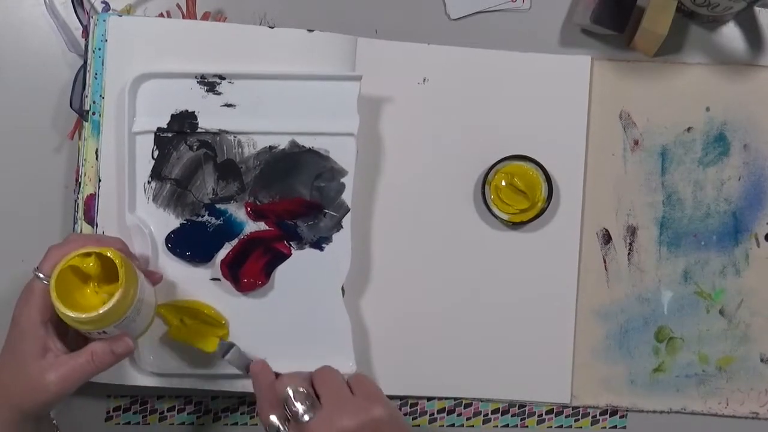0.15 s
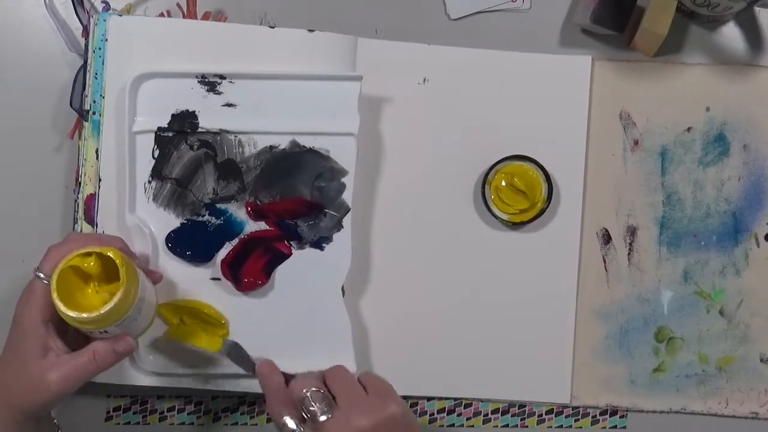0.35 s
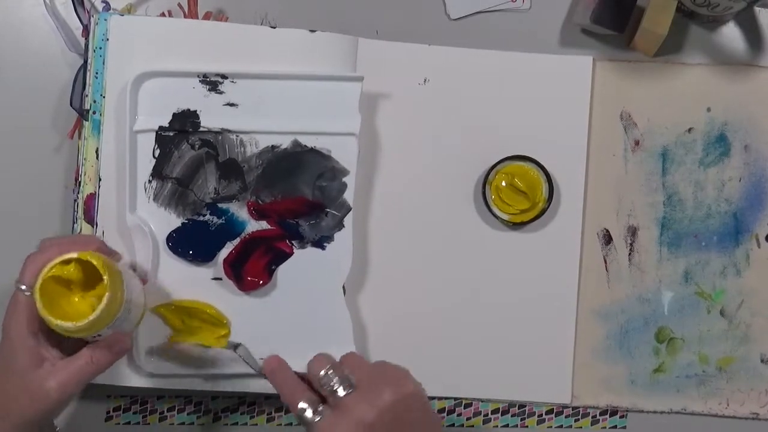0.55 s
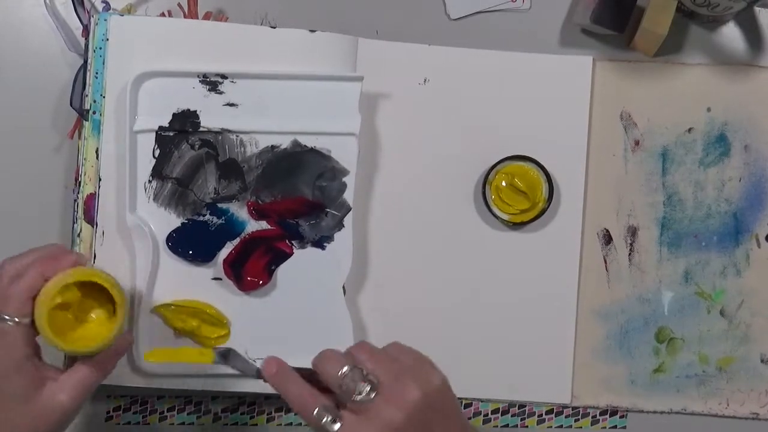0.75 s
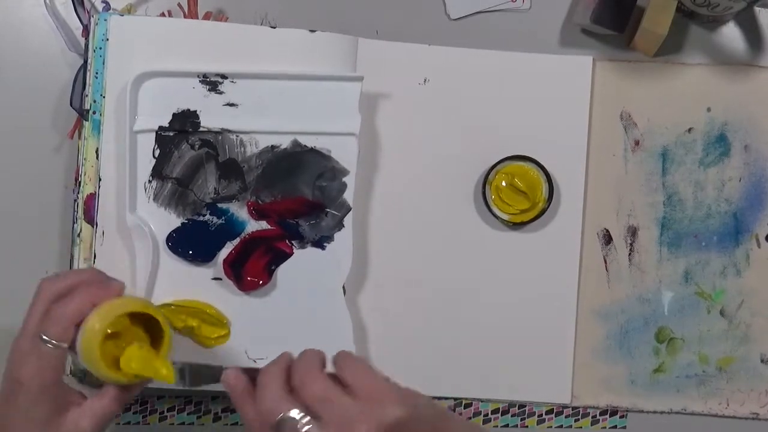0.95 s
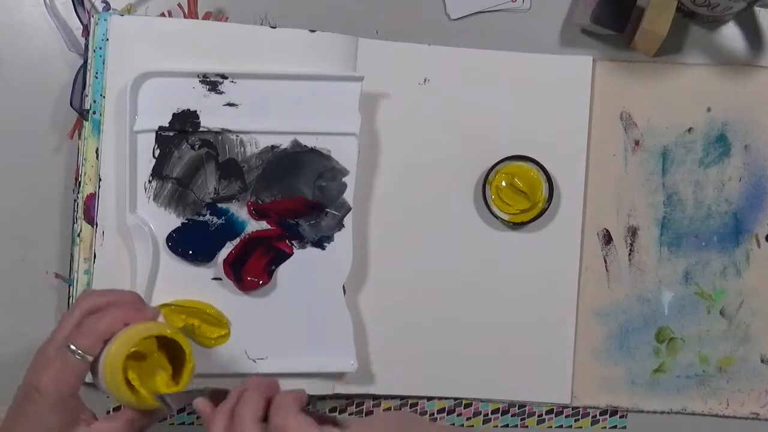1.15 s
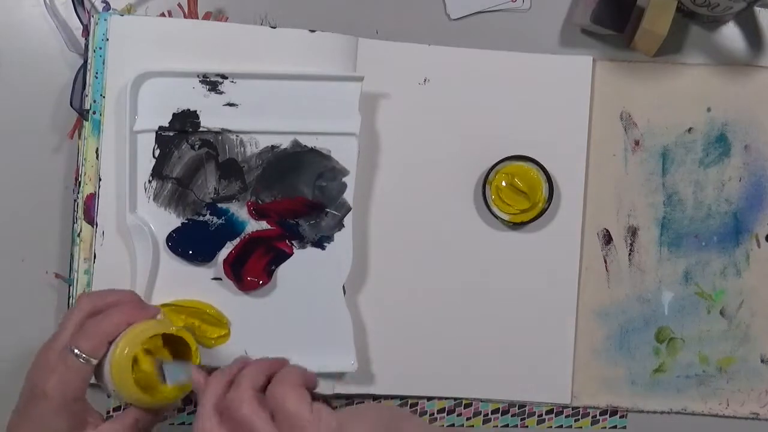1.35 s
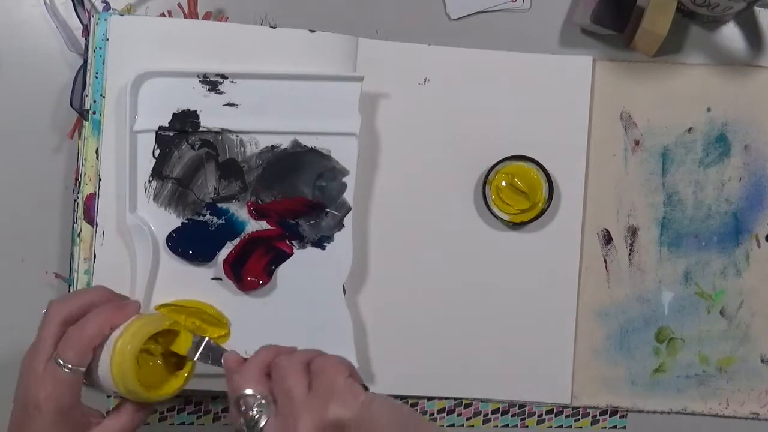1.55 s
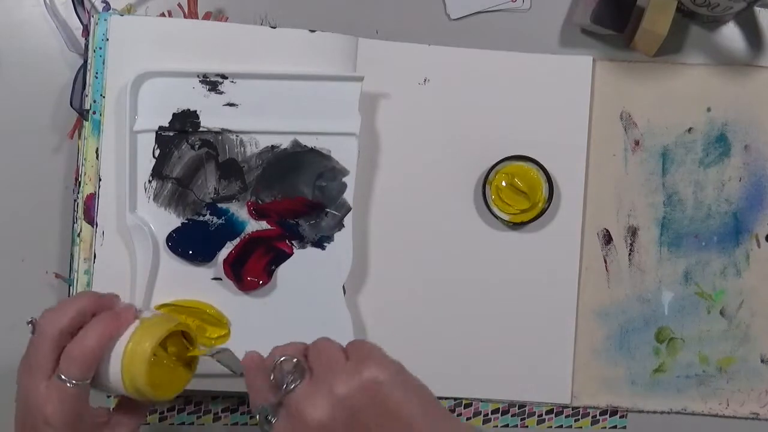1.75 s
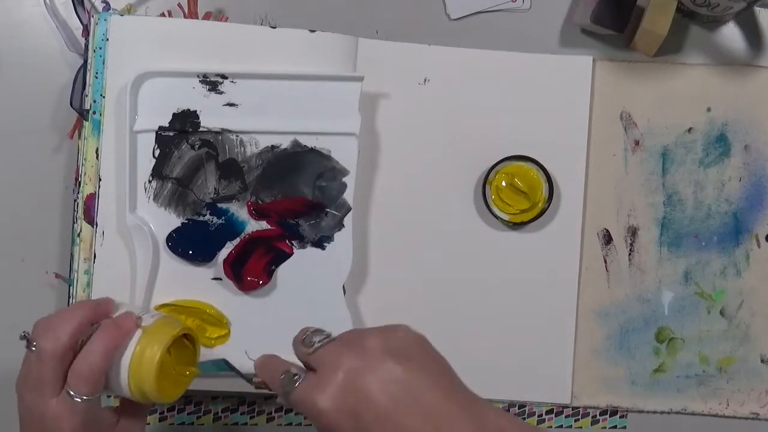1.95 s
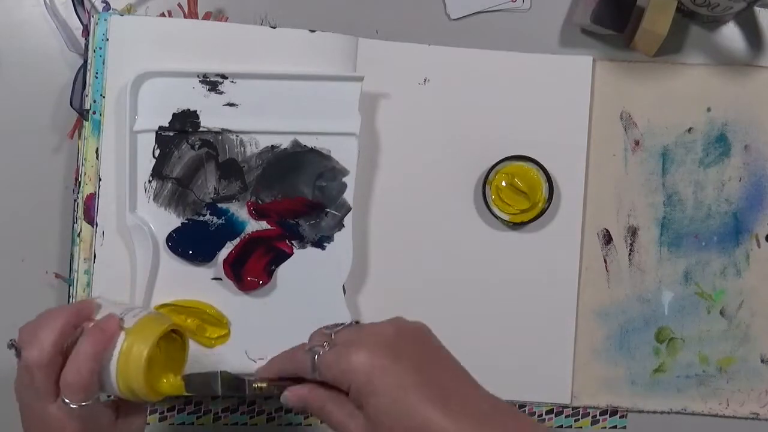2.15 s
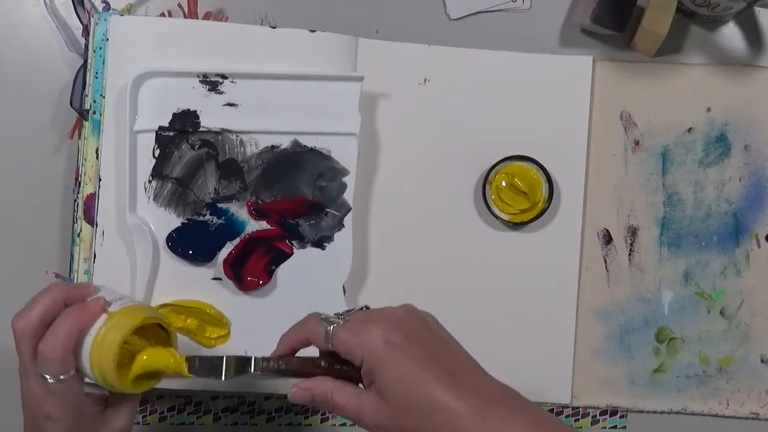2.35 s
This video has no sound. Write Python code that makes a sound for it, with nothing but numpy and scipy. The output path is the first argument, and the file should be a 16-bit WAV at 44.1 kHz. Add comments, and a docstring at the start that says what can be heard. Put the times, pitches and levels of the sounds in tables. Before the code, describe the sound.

A palette knife clacks hard on a plastic palette at about 0.1, 0.25 and 0.45 seconds, bright and dry with a short room tail and faint steel ring. After a pause, far quieter sticky scrapes in a small plastic paint jar run from 1.2 to 2.3 seconds, busiest around 1.3 to 1.7, with tiny rim ticks. A low, slightly sinking motor hum and soft room tone continue throughout.

```python
"""Palette knife and paint jar

Close in a small, fairly live room: a palette knife clacks three times on a plastic palette, each a blow and
rattle through resonances, with a faint blade ring. It then scoops thick paint from a small plastic jar: short
sticky scrapes, made of slip impulses and noise, sound the hollow, and noise bursts tick the blade on the rim.
Behind lie a slowly sinking motor hum (a sine and weak octave), low booms and room tone; the mic is almost mono."""
import sys
import numpy as np
from scipy import signal
from scipy.fft import rfft, irfft, next_fast_len
from scipy.io import wavfile
from scipy.ndimage import map_coordinates

SR = 44100
rng = np.random.default_rng(int(sys.argv[2]) if len(sys.argv) > 2 else 0)


def digitize_waveform(pressure):
    """Quantize a signal to 16-bit integers and store it at the path in sys.argv[1].

    Rows of a 2-D input are taken as channels; values are limited to [-1, 1].
    """
    field = np.atleast_2d(pressure).T
    bounded = np.clip(field, -1, 1)
    quanta = np.round(bounded * 32767).astype(np.int16)
    wavfile.write(sys.argv[1], SR, quanta)


N = 110250  # 2.5 s

# Hard taps on the palette: (time [s], level [dB], contact rattle t60 [s], treble tilt [dB/octave],
# resonance favoured by the spot struck [Hz], its boost [dB])
PALETTE_TAPS = [(0.106, -3.5, 0.003, -0.4, 10500, 6.5), (0.2649, -1, .010, -0.3, 2820, 2.5),
                (0.4263, -3.5, 0.017, -0.5, 6560, 8)]
# Resonances of blade and palette together: (frequency [Hz], width [Hz], relative level [dB])
PALETTE_RESONANCES = [(405, 210, -1), (555, 156, -7.5), (826, 66, -10.5), (1210, 120, -11), (1730, 800, -4),
                      (2760, 430, 0), (3340, 930, 4), (4110, 500, -2), (5270, 1140, 4), (6100, 480, -3.5),
                      (7250, 360, -12), (8260, 500, -4.5), (9910, 570, 0.5)]
# Long faint ring of the steel blade: (frequency [Hz], level relative to its tap [dB], t60 [s])
BLADE_RING = [(3345, -46, .3), (3421, -45, .3), (4118, -49, .28), (5401, -44, .3), (5474, -47, .3),
              (5588, -45, .3), (5642, -46, .3), (6174, -48, .25)]
PALETTE_LOW_HZ = 302  # so small an object radiates little below this
SPOT_WIDTH_HZ, TILT_PIVOT_HZ = 440, 4000
RING_SCATTER_DB = 1.5
WALL_S, WALL_DB = 0.0088, -17  # first echo of the taps
TAP_ROOM_DB = -6.5


def palette_taps():
    """Each tap is a sharp blow and very short rattle through resonances; the blade rings on faintly."""
    out = np.zeros((2, N))
    low_cut = signal.butter(4, PALETTE_LOW_HZ, 'high', fs=SR, output='sos')
    for start, db, t60, tilt_db, spot_hz, spot_db in PALETTE_TAPS:
        t = since(start)

        def body(f):
            return sum(amp(level + tilt_db * np.log2(hz / TILT_PIVOT_HZ)) * resonance(f, hz, width)
                       for hz, width, level in PALETTE_RESONANCES)

        def spot_and_wall(f):
            spot = 1 + (amp(spot_db) - 1) * resonance(f, spot_hz, SPOT_WIDTH_HZ)
            wall = 1 + amp(WALL_DB) * np.exp(-2j * np.pi * f * WALL_S)
            return spot * wall

        impulse = 1.0 * (t == 0)
        blow = signal.sosfilt(low_cut, filtered(impulse, body))
        blow = 3.26 * blow / np.linalg.norm(blow)
        rattling = signal.fftconvolve(blow, contact_rattle(t60))[:N]
        clack = filtered(rattling, spot_and_wall)
        ring = np.zeros(N)
        for hz, level, life in BLADE_RING:
            gain = amp(level + rng.normal(0, RING_SCATTER_DB))
            ring += gain * np.sin(2 * np.pi * hz * t) * dying(t, life)
        out += amp(db) * in_room(clack + ring, TAP_ROOM_DB, blow)
    return out


RATTLE_DB, RATTLE_HOLD_S = 1, 0.0016  # chatter relative to the blow; time before it starts to decay


def contact_rattle(t60, size=1024, count=6):
    """A blow and its brief chatter, pushed towards an even spectrum, with energy 1."""
    t = np.arange(size) / SR
    envelope = dying(np.maximum(t - RATTLE_HOLD_S, 0), t60)
    chatter = rng.standard_normal(size) * envelope
    blow = 1.0 * (t == 0)
    force = amp(RATTLE_DB) * chatter / np.linalg.norm(chatter) - blow
    for _ in range(count):
        flat = irfft(np.exp(1j * np.angle(rfft(force))))  # keep only the phases
        force = flat * envelope ** .25
    return force / np.linalg.norm(force)


# Scrapes in the jar: (start [s], rise [s], hold [s], fall [s], level [dB],
# hollow [Hz], hollow level [dB], blade [Hz], blade level [dB])
JAR_SCRAPES = [(0.798, 0.054, .03, 0.061, -67, 1550, 8.5, 5400, -0.5),
               (1.229, 0.034, 0.077, .05, -64.5, 1580, 9.5, 3060, -0.5),
               (1.303, 0.057, 0.013, 0.045, -39.5, 1645, -3, 7000, -6),
               (1.355, .028, .036, 0.013, -35.5, 1810, -19, 3540, -12),
               (1.385, 0.024, 0.074, 0.03, -47.5, 1500, -15, 5250, -6.5),
               (1.466, 0.023, 0.023, 0.078, -44.5, 1350, -9.5, 2650, -0.5),
               (1.489, .019, .015, 0.0099, -38, 1370, -11, 3880, -0.5),
               (1.519, 0.0046, .028, 0.018, -49, 1300, -14, 6160, -1.5),
               (1.612, 0.0024, 0.015, .02, -44, 1000, -13, 6170, -3),
               (1.664, .002, 0.0036, 0.013, -41, 1080, -29.5, 3080, -5),
               (1.674, 0.004, 0.003, 0.036, -42, 1080, 2.5, 6330, -3),
               (1.684, .008, 0.027, 0.014, -49, 1100, -37, 3600, -6.5),
               (1.733, 0.036, 0.067, 0.11, -54.5, 1125, -5.5, 6250, -13),
               (1.869, .035, 0.049, 0.18, -52.5, 1160, -1.5, 4732, -6.5),
               (2.042, 0.022, .04, 0.045, -56.5, 1260, -20, 8600, -14),
               (2.108, 0.0017, 0.038, 0.042, -52.5, 1270, -8, 3650, 0.5),
               (2.264, 0.024, 0.027, 0.047, -60.5, 1250, -6, 4700, -2)]
HOLLOW_WIDTH_HZ, BLADE_WIDTH_HZ = 300, 520
SCRAPE_WAVER_DB = 1.5


def jar_scrapes():
    """Each stroke swells, holds and dies; its slips sound the jar's hollow and a pressed-blade resonance."""
    out = np.zeros(N)
    force = stick_slip()
    rub = jar_body(force)
    for start, rise, hold, fall, db, hollow_hz, hollow_db, blade_hz, blade_db in JAR_SCRAPES:
        corners = np.cumsum([0, rise, hold, fall])
        pressure = np.interp(since(start), corners, [0, 1, 1, 0]) ** 1.96
        hollow = amp(hollow_db) * narrow(force, hollow_hz, HOLLOW_WIDTH_HZ)
        blade = amp(blade_db) * narrow(force, blade_hz, BLADE_WIDTH_HZ)
        out += amp(db) * pressure * (rub + hollow + blade)
    return out * amp(SCRAPE_WAVER_DB * wobble(130))


SLIPS_PER_S, SMOOTH_SHARE = 3500, 0.45  # smooth rubbing's share of the power
JAR_ECHO_S, JAR_ECHO_DRIFT_S, JAR_ECHO_SHARE = .0014, .00006, .3  # it shifts as the knife moves


def stick_slip():
    """Dense tiny stick-slip impulses over smooth rubbing, with a drifting echo from the jar's far wall."""
    grains = (rng.random(N) < SLIPS_PER_S / SR) * rng.standard_normal(N)
    smooth = rng.standard_normal(N)
    force = np.sqrt(1 - SMOOTH_SHARE) * unit(grains) + np.sqrt(SMOOTH_SHARE) * smooth
    delay = JAR_ECHO_S + JAR_ECHO_DRIFT_S * wobble(12)
    echo = map_coordinates(force, [np.arange(N) - delay * SR])
    return force + JAR_ECHO_SHARE * echo


# Ticks of the blade on the jar's rim: (time [s], level [dB], hollow [Hz])
RIM_TICKS = [(1.2245, -38, 1620), (1.6135, -40, 1000), (1.6638, -33, 1100), (1.6772, -37, 1040),
             (1.9468, -35.5, 1240), (2.1140, -43, 1250), (2.3255, -47, 1230)]
TICK_T60_S, TICK_HOLLOW_DB = .022, -8


def rim_ticks():
    """Light knocks on the rim, damped by paint: dying noise bursts through the jar and its hollow."""
    out = np.zeros(N)
    for start, db, hollow_hz in RIM_TICKS:
        burst = rng.standard_normal(N) * dying(since(start), TICK_T60_S)
        hollow = amp(TICK_HOLLOW_DB) * narrow(burst, hollow_hz, HOLLOW_WIDTH_HZ)
        out += amp(db) * np.std(burst) * (jar_body(burst) + hollow)
    return out


# Resonances of the jar and knife: (frequency [Hz], width [Hz], relative level [dB])
JAR_RESONANCES = [(660, 440, -12), (2100, 120, -5), (2710, 210, 0), (3340, 590, 3), (4000, 1000, 3),
                  (5400, 930, 6), (6260, 330, -4.5), (7250, 570, -7), (8600, 1100, 0.5), (9570, 560, 0),
                  (10070, 600, -7)]


def jar_body(x):
    """x through the resonances of jar and knife, at rms 1."""
    def body(f):
        return sum(amp(db) * resonance(f, hz, width) for hz, width, db in JAR_RESONANCES)
    return unit(filtered(x, body))


# Reverberation of the room: (frequency [Hz], t60 [s])
ROOM_T60 = [(200, 0.16), (1000, 0.27), (3500, 0.4073), (6000, 0.36), (10500, 0.32)]
# Colour of the reverberation: (frequency [Hz], level [dB])
ROOM_TINT = [(200, 5.5), (1200, -0.5), (3500, -5), (5500, -2), (7500, -2.5), (10500, -7)]
ROOM_BUILD_S, SIDE_DB = 0.0013, -24.5
DESK_T60_S, DESK_SIDE_DB = 0.036, -23.5  # scatter off the desk, unlike in the two channels


def in_room(x, wet_db, drive):
    """The direct sound, its scatter off the desk, and a fresh, nearly mono room tail raised by drive."""
    hz, t, noise = signal.stft(rng.standard_normal((2, SR // 2)), SR, nperseg=256)
    decay = dying(t, along(ROOM_T60, hz)[:, None])
    colour = amp(along(ROOM_TINT, hz))[:, None]
    build = 1 - np.exp(-t / ROOM_BUILD_S)
    tail = signal.istft(noise * decay * colour * build, SR, nperseg=256)[1]
    tail = tail / np.linalg.norm(tail[0])
    mid, side = amp(wet_db) * signal.fftconvolve(drive[None], tail, axes=1)[:, :N]
    desk = rng.standard_normal(SR // 20) * dying(np.arange(SR // 20) / SR, DESK_T60_S)
    scatter = signal.fftconvolve(x, desk / np.linalg.norm(desk))[:N]
    side = amp(SIDE_DB) * side + amp(DESK_SIDE_DB) * scatter
    return x + np.array([mid + side, mid - side])


# Motor hum: (time [s], pitch [Hz], level [dB])
MOTOR_HUM = [(0, 123.8, -43), (.17, 123.5, -35), (.5, 121, -37), (.86, 117.7, -34.5), (.95, 117.4, -43),
             (1.15, 117.4, -37.5), (1.4, 114.6, -50), (1.8, 115.8, -39), (2.05, 114.2, -43),
             (2.18, 115, -37.5), (2.3, 116.7, -47), (2.5, 115.9, -41)]
OCTAVE_DB = -62.5


def motor_hum():
    """A sinking sine and its weak octave, both wavering in level."""
    s, pitch, level = np.transpose(MOTOR_HUM)
    t = since(0)
    phase = 2 * np.pi * np.cumsum(np.interp(t, s, pitch)) / SR
    fundamental = amp(np.interp(t, s, level) + 0.93 * wobble(14)) * np.sin(phase)
    octave = amp(OCTAVE_DB + 4.8 * wobble(5.72)) * np.sin(2 * phase)
    return np.sqrt(2) * (fundamental + octave)  # levels are rms


# Narrow booms of the room: (frequency [Hz], width [Hz], level [dB])
ROOM_BOOMS = [(154.9, 8.5, -47.5), (198.1, 6.9, -57), (231.9, 7.6, -61), (280, 25, -58.5),
              (374, 100, -63.5)]
# Slow change of those booms: (time [s], gain [dB])
BOOM_GAIN = [(0, -6.5), (.8, -1), (1.2, -1.5), (1.5, 4), (1.9, 1.5), (2.5, 1.5)]
DEEP_HZ, DEEP_WIDTH_HZ, DEEP_DB = 73.9, 7, -51  # lowest boom, steady


def room_booms():
    """Noise through narrow room resonances."""
    booms = sum(amp(db) * narrow(rng.standard_normal(N), hz, width) for hz, width, db in ROOM_BOOMS)
    gain = amp(np.interp(since(0), *np.transpose(BOOM_GAIN)))
    deep = amp(DEEP_DB) * narrow(rng.standard_normal(N), DEEP_HZ, DEEP_WIDTH_HZ)
    return gain * booms + deep


# Spectrum of the room tone: (frequency [Hz], relative density [dB per Hz])
AIR_SPECTRUM = [(20, -34), (40, -20.5), (60, -11), (105, 1.5), (150, 0), (200, -14), (300, -14), (450, -22),
                (650, -19.5), (950, -23.5), (1500, -27.5), (2200, -31), (5500, -34), (8000, -35.5),
                (11000, -41)]
# Stereo width of the room tone: (frequency [Hz], side level [dB])
AIR_WIDTH = [(30, -13), (70, -9), (130, -18.5), (250, -9.5), (500, -13), (1500, -16), (8000, -29)]
AIR_DB = -43.5


def room_tone():
    """Coloured noise as a mid and a weaker side signal."""
    mid, side = amp(AIR_DB) * coloured(rng.standard_normal((2, N)), AIR_SPECTRUM)
    return mid, filtered(side, lambda f: amp(along(AIR_WIDTH, f)))


BASS_LEFT_DB = 1.7  # left over right below 200 Hz


def background():
    """Hum, booms and room tone, the bass leaning a little to the left."""
    air, side = room_tone()
    mid = motor_hum() + room_booms() + air

    def lean(f):
        return amp(np.outer([.5, -.5], along([(200, BASS_LEFT_DB), (600, 0)], f)))

    return filtered(np.array([mid + side, mid - side]), lean)


def amp(db):
    """Decibels to gain."""
    return 10 ** (np.asarray(db) / 20)


def unit(x):
    """Scale to rms 1."""
    return x / np.sqrt(np.mean(x ** 2) + 1e-20)


def along(points, hz):
    """(Hz, value) points interpolated on a log frequency axis."""
    f, v = np.transpose(points)
    return np.interp(np.log(hz + 1), np.log(f + 1), v)


def wobble(rate):
    """A smooth random curve, rate knots a second."""
    knots = rng.standard_normal(int(N * rate / SR) + 4)
    return map_coordinates(knots, [np.arange(N) * rate / SR])


def filtered(x, response):
    """x through a complex response of frequency."""
    m = next_fast_len(N + SR // 2)
    return irfft(rfft(x, m) * response(np.fft.rfftfreq(m, 1 / SR)), m)[..., :N]


def resonance(f, hz, width):
    """Causal response of one resonance."""
    return 1j * f * width / (hz * hz - f * f + 1j * f * width)


def narrow(x, hz, width):
    """x twice through one resonance, at rms 1."""
    b, a = signal.iirpeak(hz, hz / (1.5 * width), fs=SR)  # two passes narrow it back to about width
    return unit(signal.lfilter(b, a, signal.lfilter(b, a, x)))


def coloured(x, spectrum):
    """x with a (Hz, dB) spectrum, at rms 1."""
    return unit(filtered(x, lambda f: amp(along(spectrum, f))))


def since(start):
    """Seconds from start at every sample."""
    return (np.arange(N) - round(start * SR)) / SR


def dying(t, t60):
    """Exponential decay from t = 0, by 60 dB in t60 seconds."""
    return (t >= 0) * amp(-60 * np.maximum(t, 0) / t60)


JAR_LOW_HZ, JAR_ROOM_DB = 250, -13  # the small jar radiates little below this


def scene():
    """Taps, then scooping, over the hum."""
    low_cut = signal.butter(2, JAR_LOW_HZ, 'high', fs=SR, output='sos')
    jar = signal.sosfilt(low_cut, jar_scrapes() + rim_ticks())
    return palette_taps() + in_room(jar, JAR_ROOM_DB, jar) + background()


CEILING, TOP_HZ = .85, 11080  # peak limit (full scale 1) and band limit


def record(dry):
    """The recorder rounds off the highest peaks and cuts steeply above its band limit."""
    rounded = dry / (1 + np.abs(dry / CEILING) ** 6) ** (1 / 6)
    return filtered(rounded, lambda f: 1 / np.sqrt(1 + (f / TOP_HZ) ** 200))


dry = scene()
out = record(dry)
digitize_waveform(out)
```